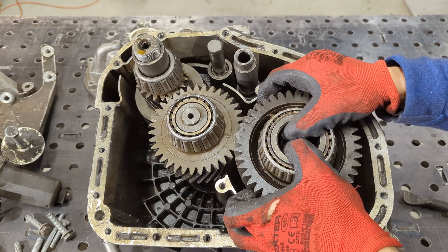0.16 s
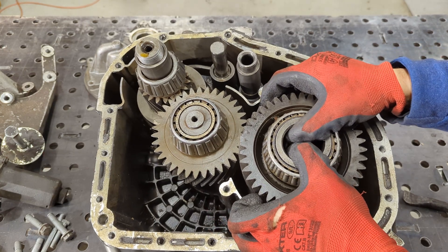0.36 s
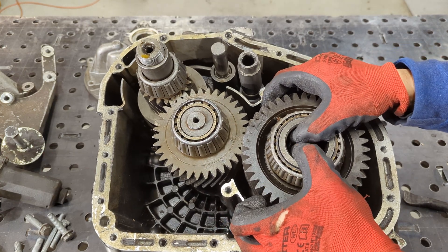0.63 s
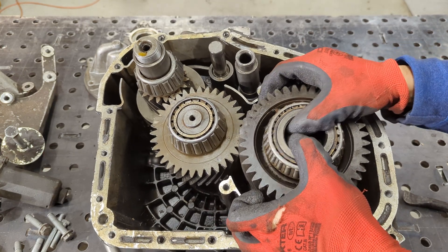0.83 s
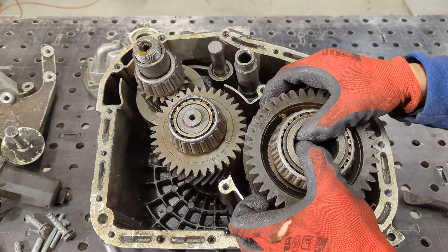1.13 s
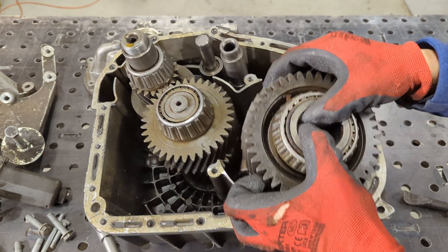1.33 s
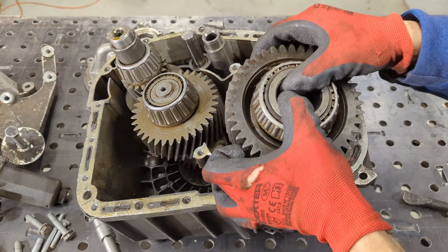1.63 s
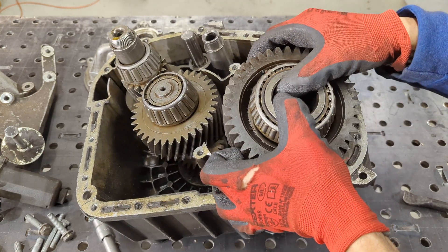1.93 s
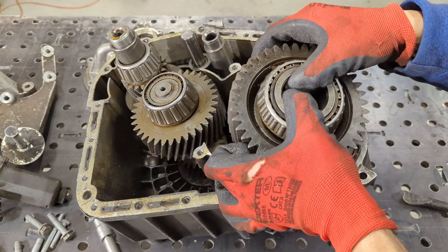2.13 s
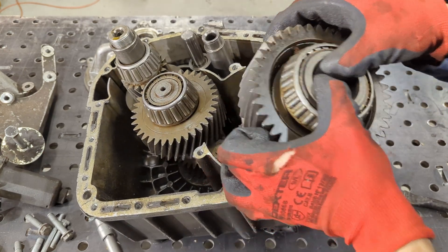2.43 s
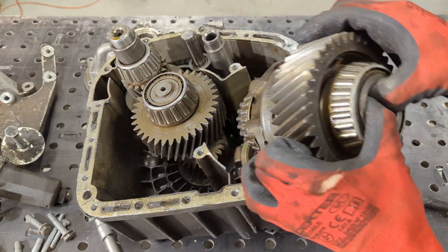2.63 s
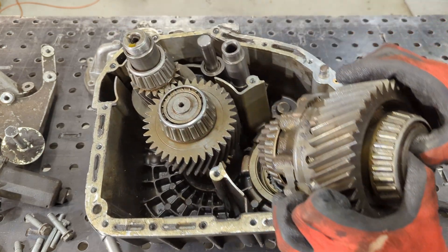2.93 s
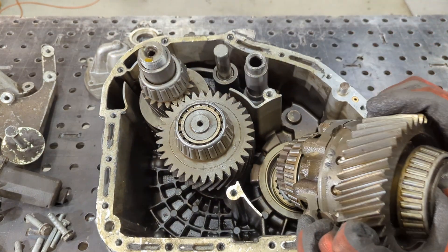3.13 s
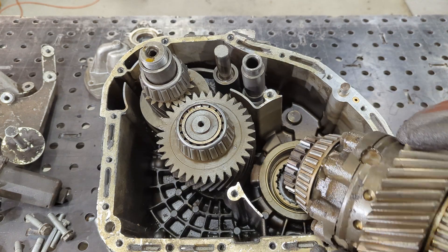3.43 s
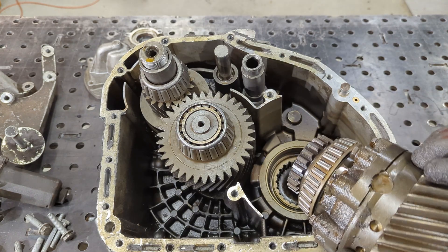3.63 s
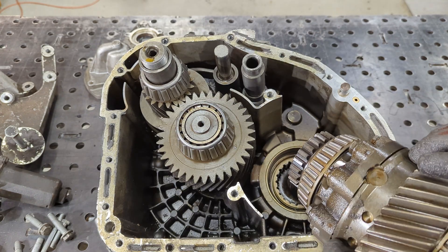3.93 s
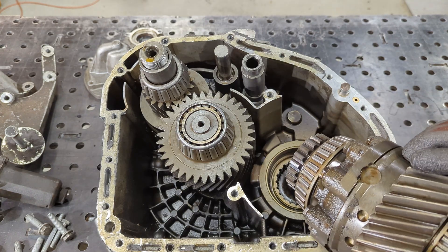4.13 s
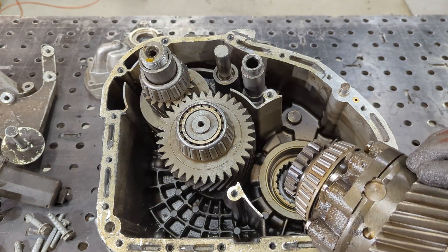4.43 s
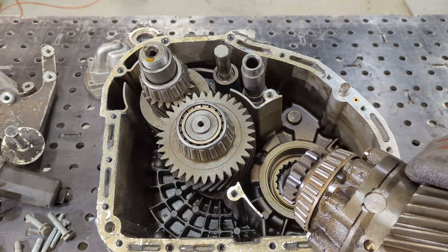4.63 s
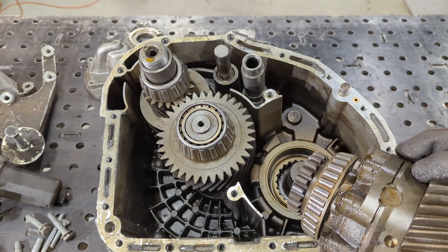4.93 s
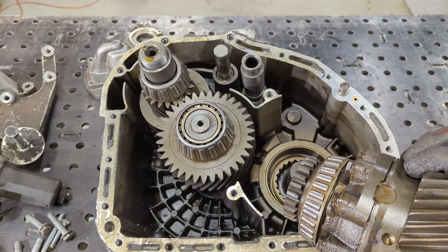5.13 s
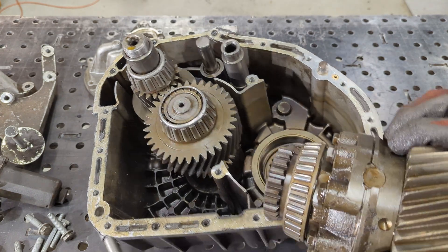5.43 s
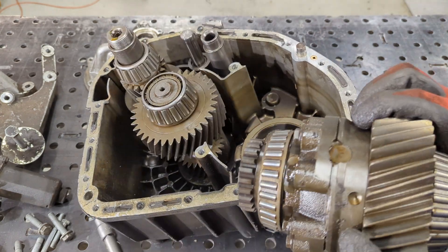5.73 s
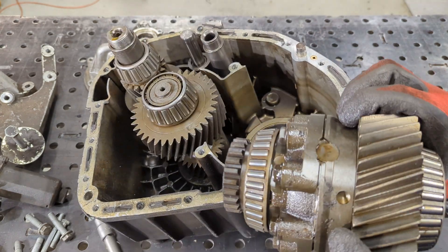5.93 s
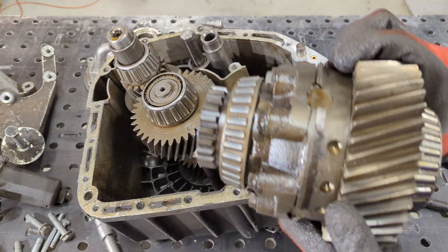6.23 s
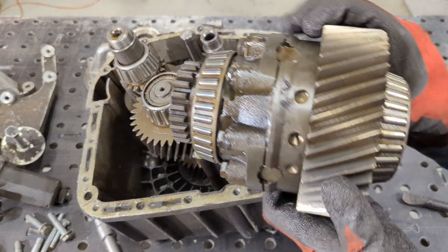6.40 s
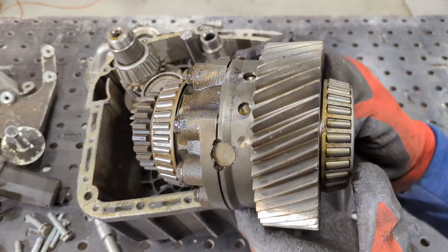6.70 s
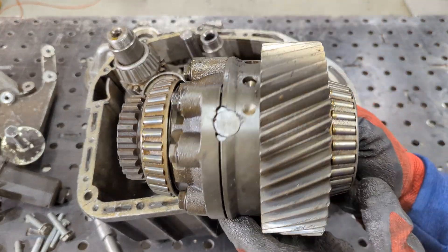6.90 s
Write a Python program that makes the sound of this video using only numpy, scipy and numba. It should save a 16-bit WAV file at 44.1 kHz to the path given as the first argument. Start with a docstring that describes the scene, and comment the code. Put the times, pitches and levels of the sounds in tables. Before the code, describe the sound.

Heavy steel gears knock and clank against a ringing metal case as they are handled in a workshop.

```python
"""In a hard-walled workshop, heavy gears are worked out of a cast gearbox case on a steel bench.
Each knock chatters briefly and rings the case. Some knocks make a free gear chime, and hard ones
set the bench top humming for seconds. Short metal clicks and rubbing gloves sound over a low
room hum. A close stereo microphone picks it all up, and a limiter holds down the loudest blows."""
import sys
import numpy as np
from scipy import signal
from scipy.fft import rfft, irfft
from scipy.io import wavfile
from scipy.ndimage import uniform_filter1d, minimum_filter1d
from numba import njit

SR = 44100
rng = np.random.default_rng(int(sys.argv[2]) if len(sys.argv) > 2 else 0)


def digitize_waveform(pressure):
    """Quantize a signal to 16-bit integers and store it at the path in sys.argv[1].

    Rows of a 2-D input are taken as channels; values are limited to [-1, 1].
    """
    field = np.atleast_2d(pressure).T
    bounded = np.clip(field, -1, 1)
    quanta = np.round(bounded * 32767).astype(np.int16)
    wavfile.write(sys.argv[1], SR, quanta)


N = 311331


def undb(db):
    """Turn decibels into a factor to multiply a sound by."""
    return 10 ** (np.asarray(db) / 20)


def value_at(hz, table):
    """Read between (frequency, value) points, giving each octave equal space."""
    points_hz, values = np.transpose(table)
    return np.interp(np.log(np.maximum(hz, 1)), np.log(points_hz), values)


def stereo_width(hz):
    """How far left and right differ: hardly at all in the bass, a lot in the treble."""
    return 0.92 * np.clip(hz / 914.0, 0, 1) ** 1.1


def hiss(colour, size):
    """Stereo noise of average strength 1; colour says how strong each frequency is."""
    hz = np.fft.rfftfreq(size, 1 / SR)
    mid, side = rfft(rng.standard_normal((2, size)))
    stereo = mid + stereo_width(hz) * side * np.array([[1], [-1]])
    noise = irfft(undb(value_at(hz, colour)) * stereo, size)
    return noise / np.std(noise)


def convolve(x, echoes):
    """Add up delayed copies of x, one for each sample of echoes."""
    return signal.fftconvolve(x, echoes, axes=-1)[..., :x.shape[-1]]


def ring(modes, size):
    """One complex wave per mode (a natural tone of an object); it fades 60 dB in its ring time."""
    hz, db, ring_s = np.array(modes).T[:, :, None]
    t = np.arange(size) / SR
    return undb(db) * np.exp((2j * np.pi * hz - np.log(1000) / ring_s) * t)


def peak_rms(x):
    """The strength of the loudest 6 ms of a sound."""
    return np.sqrt(uniform_filter1d(np.mean(x ** 2, axis=0), size=256).max())


@njit
def follow_peaks(x, release):
    """Track a level: jump up at once, sink slowly."""
    level, levels = 0., np.empty(len(x))
    for i in range(len(x)):
        level = max(x[i], level * release)
        levels[i] = level
    return levels


def workshop_hum():
    """A low, steady room hum, turned up and down on a set curve, as by a recorder's gain control."""
    # tone of the hum: (frequency [Hz], level [dB])
    colour = [(18, -62.5), (30, -15), (79, 5.5), (199, 2.5), (415, 1.5), (937, -9), (1010, -42),
              (1100, -5.5), (2680, -13.5), (10800, -30), (16000, -35.5)]
    # how far the hum is turned up or down: (time [s], gain [dB])
    gain_curve = [(0, -69.5), (.15, -73.5), (.4, -57), (4.5, -64.5), (5.2, -66.5), (7.06, -61)]
    gain_db = np.interp(np.arange(N) / SR, *np.transpose(gain_curve))
    return undb(gain_db) * hiss(colour, N)


def room_echo(x, rise_s=0.0049):
    """Hard walls return dense echoes that build up quickly and fade at their own rate in each octave."""
    # how long the room rings: (frequency [Hz], time to fade 60 dB [s])
    fade_times = [(60, 1), (150, 0.74), (400, 0.6), (1000, 0.94), (3000, 0.87), (8000, 0.8), (15000, 0.073)]
    size = 2 * SR
    t, hz = np.arange(size) / SR, np.fft.rfftfreq(size, 1 / SR)
    noise, echoes = rfft(hiss([(20, 0), (20000, 0)], size)), 0
    for centre in 45 * 2. ** np.arange(9):
        octaves_away = np.log2(np.maximum(hz, 1) / centre)
        band = np.cos(np.pi / 2 * np.clip(octaves_away, -1, 1)) ** 2
        fade = np.exp(-np.log(1000) * t / value_at(centre, fade_times))
        echoes += irfft(noise * band, size) * fade
    echoes *= 1 - np.exp(-t / rise_s)
    return convolve(x.mean(axis=0)[None], echoes / np.sqrt(np.sum(echoes ** 2) / 2))


def glove_rubs(edge_s=0.023, grain_db=1.0):
    """Glove fabric drags over steel in small slips, making a grainy hiss."""
    # strokes of a glove: (start [s], length [s], start level [dB], end level [dB])
    rubs = [(2.923, .7, -58, -56.5), (3.59, 0.4, -57, -77.5), (5.414, 0.1, -59.5, -70),
            (6.208, 0.406, -76, -63), (6.618, .14, -54.5, -69), (6.74, 0.3, -72, -78)]
    # tone of the rubbing: (frequency [Hz], level [dB])
    colour = [(1500, -13.5), (3000, -1), (5000, -9.5), (6300, -2), (7500, -10.5), (9200, -6),
              (11000, -15.5), (16000, -20.5)]
    t, gain = np.arange(N) / SR, 0
    for start, length, start_db, end_db in rubs:
        edges = np.clip(np.minimum(t - start, start + length - t) / edge_s, 0, 1)
        gain += edges * undb(np.interp(t, (start, start + length), (start_db, end_db)))
    slips = uniform_filter1d(rng.standard_normal(N), size=600) * np.sqrt(600)
    return gain * undb(grain_db * slips) * hiss(colour, N)


def metal_clicks(fade_s=0.0015, right_louder_db=4.5):
    """Light ticks of parts and the sharp snap of a hard knock: short bursts of noise around a pitch."""
    # clicks: (time [s], level [dB], pitch [Hz], spread to either side [octaves])
    clicks = [(0.876, -61, 3920, 1.2), (0.91, -43.5, 2240, 0.37), (0.934, -46, 6600, 0.21),
              (0.935, -42, 11780, 0.16), (1.185, -57, 9970, 0.58), (1.453, -52.5, 6780, 0.18),
              (1.496, -53.5, 4090, 0.18), (2.879, -62.5, 5025, 0.87), (3.188, -41, 5950, 0.65),
              (3.346, -43, 6900, 0.43), (3.966, -54, 3000, .65), (4.011, -43.5, 1907, 0.37),
              (4.012, -56, 5400, .3), (4.014, -51, 580, .15), (4.085, -49.5, 580, .15),
              (4.086, -46.5, 1605, 0.71), (4.095, -60, 5760, .3), (4.270, -55.5, 2130, .3),
              (4.298, -61, 2250, 0.75), (4.55, -65, 1464, .6), (4.65, -67.5, 2870, .4),
              (4.692, -39, 1890, 0.058), (4.715, -48, 10080, 0.88), (5.137, -59, 1894, 0.38),
              (5.295, -41, 1966, 0.086), (5.433, -55.5, 6180, 0.54), (5.502, -48.5, 6250, .15),
              (6.222, -67, 7840, 0.95), (6.38, -54, 4500, 0.9), (6.464, -63, 4530, 1.2),
              (6.513, -63, 7700, .3), (6.565, -49.5, 5000, 0.81), (6.746, -53, 3970, 1.1)]
    size = 2048
    t, out = np.arange(size) / SR, np.zeros((2, N + size))
    sides_db = np.array([[-.5], [.5]]) * right_louder_db
    for start, db, hz, octaves in clicks:
        band_hz = (hz / 2 ** octaves, min(hz * 2 ** octaves, .45 * SR))
        band = signal.butter(2, band_hz, "bandpass", fs=SR, output="sos")
        noise = rng.standard_normal((2, size))
        fade = np.exp(-t * octaves ** 1.2 / fade_s)  # purer clicks last longer
        click = signal.sosfilt(band, (noise + noise[::-1] / 2) * fade)
        i = int(start * SR)
        out[:, i:i + size] += undb(db + sides_db) * click / peak_rms(click)
    return out[:, :N]


def bench_ring():
    """The bench top takes each shock through the feet of the case and rings on."""
    # blows that shake the bench: (time [s], level [dB], extra for the lowest tone [dB])
    shocks = [(.29, -27, 0), (.94, -30.5, 1), (1.56, -15, -0.5), (2.71, -19, -0.5), (3.19, -5, -6),
              (4.7, -42.5, -15.5), (5.61, -5, 5)]
    # natural tones of the bench top: (pitch [Hz])
    pitches = [55, 767, 811, 897, 1007, 1170, 1470, 1920]
    # how each of those tones rings: (level [dB], ring time [s])
    ringing = [(-28, 1.2), (-23.5, 1.94), (-43.5, 6.5), (-46, 4), (-44, 3.7), (-38, 1.5), (-42.5, 1.1),
               (-57, 4.8)]
    tones, out = ring(np.column_stack([pitches, ringing]), N), np.zeros((2, N))
    width = stereo_width(np.array(pitches))
    for start, db, low_db in shocks:
        phase = width * rng.standard_normal(len(pitches)) / 2
        weights = np.exp(1j * np.outer([1, -1], phase))  # left and right are a little out of step
        weights[:, 0] *= undb(low_db)
        i = int(start * SR)
        out[:, i:] += undb(db) * (weights @ tones[:, :N - i]).imag
    return out


def gear_chimes():
    """The free gear is struck and chimes with a few clear tones."""
    # natural tones of the gear: (pitch [Hz], relative level [dB], ring time [s])
    modes = [(3770, 2, 0.27), (2070, -3.5, .12), (5700, -19, .1)]
    # blows that land on the gear: (time [s], level [dB])
    blows = [(.289, -42.5), (.599, -55.5), (.937, -49), (1.415, -48.5), (1.559, -45), (2.208, -43.5),
             (3.122, -34), (3.187, -37.5), (3.291, -43), (5.5, -58.5), (5.606, -28)]
    size = 16384
    wave, out = ring(modes, size).sum(axis=0), np.zeros((2, N + size))
    chime = np.array([wave.imag, wave.real])  # left and right are a quarter wave apart
    for start, db in blows:
        i = int(start * SR)
        out[:, i:i + size] += undb(db) * chime / peak_rms(chime)
    return out[:, :N]


def case_knocks(scatter_db=1.5, pan_scatter_db=2, clatter_db=18.0, first_touch=1.67, rise_s=0.00087):
    """Each blow lands on a new spot of the gearbox case, so it wakes a new mix of the case's tones."""
    # blows: (time [s], body level [dB], bench thud [dB], metal clank [dB], bright snap [dB], chatter [s])
    # thud, clank and snap are counted from the body level
    blows = [(0.131, -35.5, -12.5, -14.5, -31, 0.0076), (0.289, -13.5, -35, -8, -24.5, 0.0076),
             (0.311, -19.5, -41, -5, -27.5, 0.019), (0.342, -28, -6, -4.5, -18, 0.012),
             (0.445, -35.5, -40, -13, -31, 0.011), (0.599, -18.5, -25, -8.5, -29.5, 0.018),
             (0.767, -36.5, -10.5, -6.5, -26.5, 0.0029), (0.937, -24.5, -19, 3, -9.5, .004),
             (1.316, -21.5, -50, -15, -29, 0.001), (1.344, -37, -7, 2.5, -18.5, 0.017),
             (1.402, -34, -25.5, -20.5, -19.5, 0.0041), (1.415, -35, -1, 6, -20.5, 0.013),
             (1.457, -39.5, -4.5, 4.5, -14.5, 0.0087), (1.502, -27, -24, -5.5, -24.5, 0.028),
             (1.56, -11.5, -12, 4.5, -1.5, 0.0049), (1.589, -9, -26.5, -7, -19, 0.015),
             (1.649, -20, -6, -13.5, -32.5, 0.0057), (1.708, -18.5, -21.5, -5.5, -29.5, 0.0078),
             (2.144, -36.5, -33.5, -25.5, -39, 0.0037), (2.206, -26, -39.5, -4.5, -20, 0.019),
             (2.218, -32.5, -19, -1, -26.5, 0.0071), (2.505, -45.5, -0.5, 1, -20.5, 0.016),
             (2.597, -49.5, -22, -4, -33, 0.011), (2.714, -11, -40.5, -14.5, -33, 0.0042),
             (2.852, -40.5, 3, -0.5, -33.5, 0.023), (3.123, -10.5, -22, 1, -15, 0.014),
             (3.189, -5.5, -27, -0.5, -13.5, 0.011), (3.223, -37, -24.5, -2.5, -13.5, 0.0037),
             (3.29, -21.5, -35.5, -8, -15, 0.006), (3.47, -47, -4, -1, -6, 0.016),
             (4.685, -34, -15, -11.5, -29, 0.025), (4.715, -28, -4, -14.5, -29, 0.016),
             (5.289, -26, -42.5, -27.5, -35, 0.004), (5.294, -41, -1, -1, -19.5, 0.0077),
             (5.498, -18.5, -7.5, -31, -31, 0.0043), (5.51, -32, -15, 7, -17, 0.0092),
             (5.563, -39.5, 3.5, -9.5, -12, 0.015), (5.606, -2, -35.5, -0.5, -8, 0.016),
             (5.625, -7.5, -44, -8, -7.5, 0.021), (5.649, -3, -37, 1.5, -16, 0.0072),
             (5.703, -41, -24.5, -0.5, -9, 0.0065), (6.625, -56, 2.5, 1.5, -16, 0.02)]
    # natural tones of the case: (pitch [Hz], relative level [dB], ring time [s])
    modes = [(64, -18, 0.23), (131.4, -9, 0.13), (215, -23.5, 0.037), (282.3, -7, 0.22), (370.6, 16, 0.026),
             (367, -5.5, 0.024), (465, -14.5, 0.29), (621.5, -8, 0.28), (666.4, 6, 0.045),
             (789.6, -6, 0.092), (1017, 0, 0.14), (1184, 0, 0.076), (1194, -6.5, 0.2), (1463.5, 4.5, 0.072),
             (1560.3, 7.5, 0.07), (1734, 9, 0.033), (2030, -7.5, 0.27), (2440, -13.5, 0.063),
             (2774, 1, 0.043), (2890, -7, 0.046), (4382, -47.5, .08), (5600, -38, .06), (6470, -19, 0.11)]
    # a crowd of weaker tones, heard as noisy clatter: (frequency [Hz], level [dB])
    clatter = [(50, -10), (200, -8), (600, 1), (1500, -4), (2200, -5.5), (3000, -7.5), (5000, -19.5),
               (8000, -25), (12000, -28.5), (16000, -37)]
    # ranges of thud, body, low clank, clank, snap and top snap: (low edge [Hz], high edge [Hz])
    bands = [(45, 180), (180, 750), (750, 1350), (1350, 2300), (2300, 5200), (5200, 16000)]
    leans = (.1, .25, .26, .98, .25, .77)  # how much each band leans to one side; the bass leans least
    size = 16384
    t, out = np.arange(size) / SR, np.zeros((2, N + size))
    width = stereo_width(np.array(modes)[:, 0])
    filters = [signal.butter(2, band, "bandpass", fs=SR, output="sos") for band in bands]
    for start, db, thud, clank, snap, chatter_s in blows:
        share, phase, detune = rng.standard_normal((3, len(modes)))
        pan_db = pan_scatter_db * rng.standard_normal() * np.array([[1], [-1]])
        # hands and parts press on the case differently each time, so its pitches shift a little
        shifted = np.array(modes)
        shifted[:, 0] *= 1 + 0.006 * detune
        weights = undb(scatter_db * share) * np.exp(1j * np.outer([1, -1], width * phase))
        ringing = (weights @ ring(shifted, size)).imag
        # the contact skips: a first touch, then quick rebounds that die away
        fade = np.exp(-t / np.clip(chatter_s, .001, .018))
        touches = rng.standard_normal(size) * fade * (rng.random(size) < .01)
        touches[0] = first_touch
        knock = convolve(ringing, touches[None]) + undb(clatter_db) * hiss(clatter, size) * fade
        # a lighter blow pushes longer, so it starts more softly
        knock *= 1 - np.exp(-t / (rise_s * undb(-.3 * db)))
        levels_db = (thud, 0, clank - 1.5, clank, snap, snap - 3)
        i = int(start * SR)
        for k, band in enumerate(filters):
            # flip every other band so that neighbours do not cancel where they meet
            part = (-1) ** k * signal.sosfilt(band, knock)
            out[:, i:i + size] += undb(db + levels_db[k] + leans[k] * pan_db) * part / peak_rms(part)
    return out[:, :N]


def scene(echo_db=-5.5):
    """The sounds of the work and their echo, with the ringing bench and the workshop hum."""
    work = case_knocks() + gear_chimes() + metal_clicks() + glove_rubs()
    return work + bench_ring() + undb(echo_db) * room_echo(work) + workshop_hum()


def record(dry, bass_hz=46., top_hz=16000, limit_db=-1.5, ratio=12.0, release_s=0.021):
    """The microphone drops the deep bass, a limiter turns the peaks down, and the top treble is cut."""
    bass_cut = signal.butter(4, bass_hz, "highpass", fs=SR, output="sos")
    top_cut = signal.ellip(10, .2, 90, top_hz, fs=SR, output="sos")
    sound = signal.sosfilt(bass_cut, dry)
    peak = follow_peaks(np.abs(sound).max(axis=0), np.exp(-1 / (release_s * SR)))
    gain = np.minimum(1, undb(limit_db) / peak) ** (1 - 1 / ratio)
    gain = uniform_filter1d(minimum_filter1d(gain, size=64), size=32)  # ease down just before a peak
    return signal.sosfilt(top_cut, sound * gain)


dry = scene()
out = record(dry)
digitize_waveform(out)
```